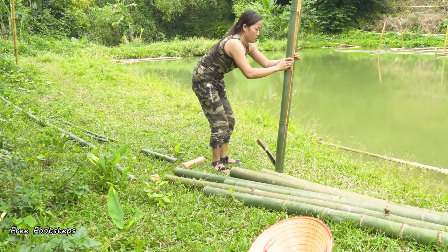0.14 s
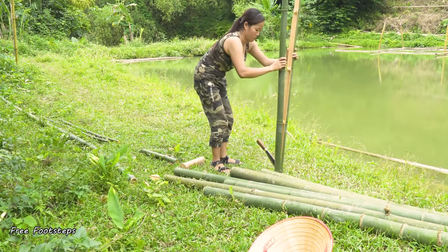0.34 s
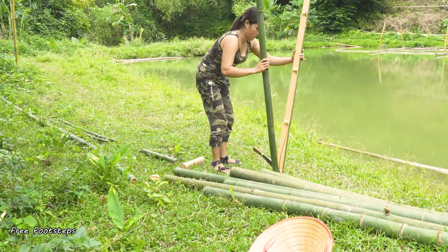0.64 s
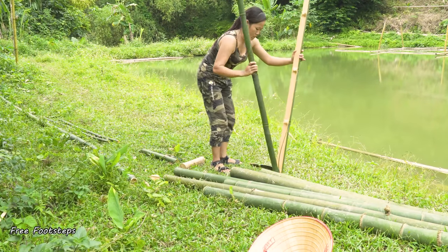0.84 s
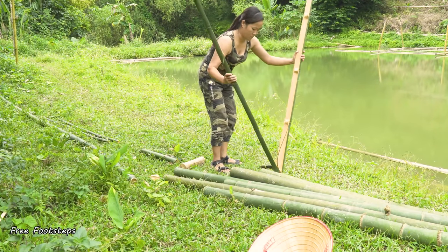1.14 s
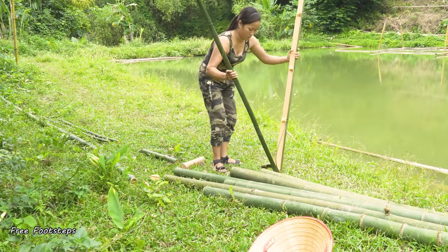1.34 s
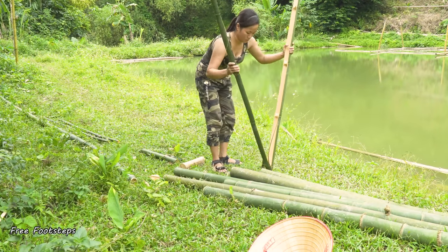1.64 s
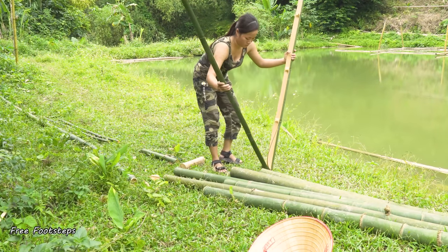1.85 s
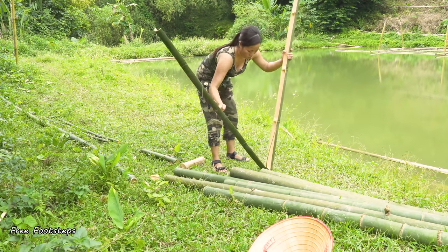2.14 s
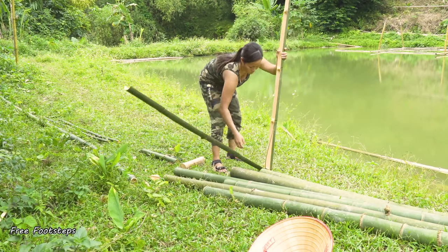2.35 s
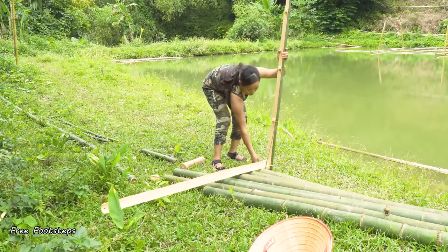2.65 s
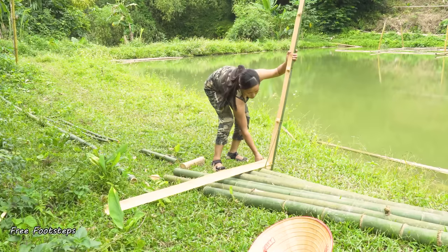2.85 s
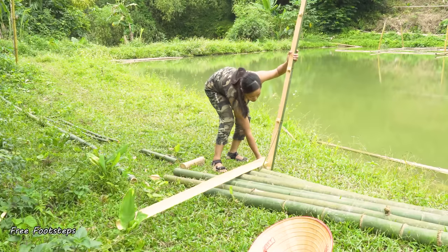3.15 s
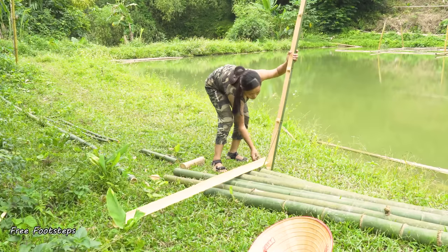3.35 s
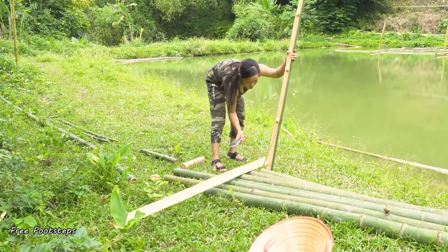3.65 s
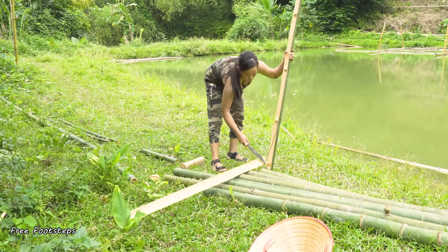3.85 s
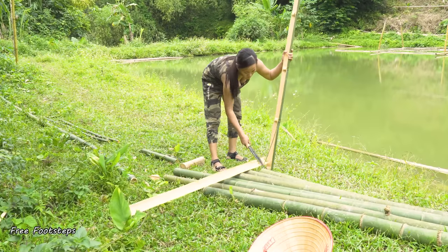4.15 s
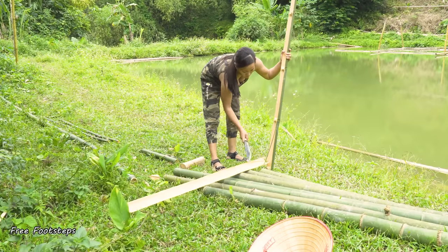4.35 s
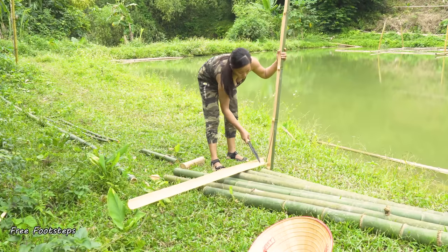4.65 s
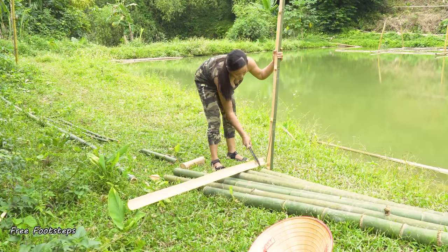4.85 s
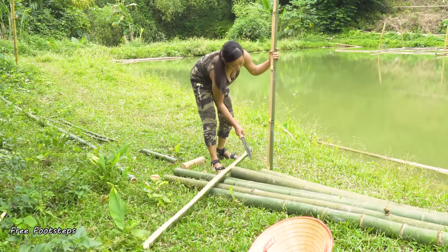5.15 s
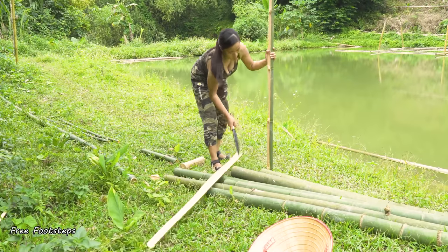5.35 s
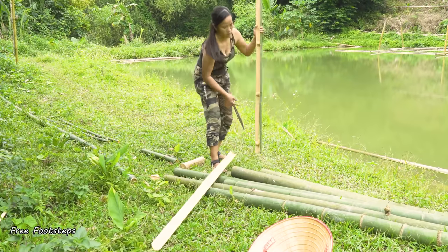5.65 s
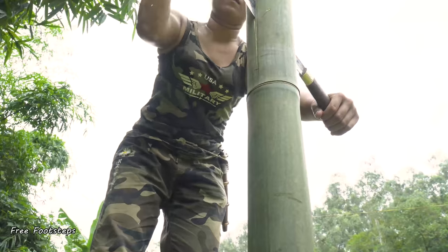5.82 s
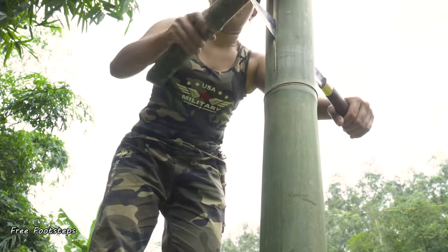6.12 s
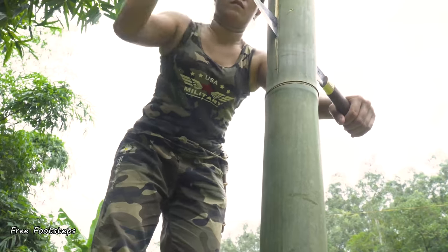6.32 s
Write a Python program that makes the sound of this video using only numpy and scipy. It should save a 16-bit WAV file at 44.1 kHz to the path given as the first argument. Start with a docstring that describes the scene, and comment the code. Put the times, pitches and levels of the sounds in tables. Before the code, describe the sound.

Open-air bamboo work with short, scattered reflections from the bank. Early snaps and gritty ripping give way to a quiet spell with light ticks, then a hollow clatter. After a pause come four hard, dry machete strokes, the first and last rebounding quickly, with a trace of thin steel ring. Knocks tumble into a bright woody clatter; one deeper hollow blow ends it, over steady low wind and high insects.

```python
"""Wind rumbles on the microphone as filtered noise and insects shrill in narrow bands of noise, all through.
Green bamboo splits on a pond bank: noise-burst cracks, grainy tearing, dull bumps, then a hand's sliding hiss.
A first half clatters onto a stack, each landing a crunch of noise with decaying sine modes.
A machete chops the second half free with a thin steel ring; it skids off in small knocks and clatters too.
Last, a club drives the blade into a standing pole close by; the bank scatters the contacts back."""
import sys
import numpy as np
from scipy import signal
from scipy.fft import rfft, irfft, next_fast_len
from scipy.io import wavfile
from scipy.ndimage import map_coordinates

SR = 44100
rng = np.random.default_rng(int(sys.argv[2]) if len(sys.argv) > 2 else 0)


def file_out(sig):
    """Save sig as 16-bit WAV at sys.argv[1]."""
    # one column per channel
    cols = np.atleast_2d(sig).T
    # limit, then scale
    lim = np.clip(cols, -1, 1)
    pcm = np.round(lim * 32767).astype(np.int16)
    wavfile.write(sys.argv[1], SR, pcm)


N = 285768  # length [samples]


def amp(db):
    """Decibels to a linear gain."""
    return 10 ** (np.asarray(db) / 20)


def unit(x):
    """The signal scaled to rms 1."""
    return x / np.sqrt(np.mean(x ** 2) + 1e-20)


def along(points, hz):
    """Read (frequency [Hz], value) points on a log frequency axis."""
    f, v = np.transpose(points)
    return np.interp(np.log(hz + 1), np.log(f + 1), v)


def curves(rows):
    """One value per sample for each column after the time."""
    s, *cols = np.transpose(rows)
    return [np.interp(np.arange(N) / SR, s, c) for c in cols]


def wobble(rate, size=N):
    """A smooth random curve, rate knots a second."""
    knots = rng.standard_normal(int(size * rate / SR) + 4)
    return map_coordinates(knots, [np.arange(size) * rate / SR])


def filtered(x, response):
    """The signal shaped by a response of frequency."""
    size = next_fast_len(len(x) + SR // 4)
    spectrum = rfft(x, size) * response(np.fft.rfftfreq(size, 1 / SR))
    return irfft(spectrum, size)[:len(x)]


def noise(colour):
    """Noise of rms 1 with the given colour."""
    return unit(filtered(rng.standard_normal(N), lambda hz: amp(along(colour, hz))))


def shrill(centre_hz, width_hz):
    """Noise of rms 1 in one resonance."""
    return unit(filtered(rng.standard_normal(N), lambda hz: 1 / (1 + ((hz - centre_hz) / width_hz) ** 2)))


def causal(gain):
    """The minimum-phase response with this gain, so nothing sounds ahead of its cause."""
    cepstrum = irfft(np.log(np.maximum(gain, 1e-6)))
    half = len(cepstrum) // 2
    cepstrum[1:half] *= 2
    cepstrum[half + 1:] = 0
    return np.exp(rfft(cepstrum))


def add(track, s, sound):
    """Mix a sound into the track at time s."""
    start = max(round(s * SR), 0)
    track[start:start + len(sound)] += sound[:len(track) - start]


# colour of the bamboo wall: (frequency [Hz], level [dB])
WALL_COLOUR = [(60, -24), (150, 4.5), (300, 16.5), (600, 14.5), (1200, 12), (2300, 11), (3500, 10),
               (5500, 10.5), (8000, 3), (11000, 2.5), (16000, -11.5)]
# reach of a heavy contact, which weights every thud setting: (frequency [Hz], share)
THUD_REACH = [(600, 0.43), (1200, 0.0037)]
# reach of a sharp contact, which weights every snap setting: (frequency [Hz], share)
SNAP_REACH = [(3200, 0.16), (6500, 0.74), (14000, 1.55)]


def contact(knock_hz, thud_db, snap_db, t60, crunch, knock_db=6, knock_octaves=0.51, size=16384):
    """A sharp push and a dying crunch of fibres, heard through the wall, which resonates at the struck spot."""
    t, hz = np.arange(size) / SR, np.fft.rfftfreq(size, 1 / SR)
    clumps = amp(2.3 * wobble(704, size=size))
    force = crunch * clumps * rng.standard_normal(size) * amp(-60 * t / max(t60, .004))
    force[0] = 1  # the push
    spot_db = knock_db * np.exp(-(np.log2((hz + 1) / knock_hz) / knock_octaves) ** 2)
    weight_db = thud_db * along(THUD_REACH, hz)
    sharpness_db = snap_db * along(SNAP_REACH, hz)
    colour = amp(along(WALL_COLOUR, hz) + spot_db + weight_db + sharpness_db)
    return 2.197 * irfft(rfft(force) * causal(colour))


def ring(modes, swell_cycles, size=16384):
    """Modes at new strengths; each takes some cycles to build up, so the deep ones bloom last."""
    t = np.arange(size) / SR
    hz, db, t60 = np.transpose(modes)[:, :, None]
    strength = amp(db + 2 * rng.standard_normal(hz.shape))
    pitch = hz * (1 + 0.0078 * rng.standard_normal(hz.shape))
    swell = 1 - np.exp(-(t * hz / swell_cycles) ** 2)
    phase = 2 * np.pi * (pitch * t + rng.random(hz.shape))
    return np.sum(strength * swell * amp(-60 * t / t60) * np.sin(phase), axis=0)


# decay of the scatter from the bank: (frequency [Hz], t60 [s])
BANK_DECAY = [(200, 0.46), (600, 0.2), (2000, 0.23), (6000, 0.47), (14000, 0.16)]
# colour of that scatter: (frequency [Hz], level [dB])
BANK_COLOUR = [(100, -5), (300, 0), (700, 6.5), (2000, -6), (5000, -12), (14000, -4)]


def outdoors(x, wet_db, rise=0.012):
    """The sound plus its scatter from the bank, which builds up (the deep part last) and dies away."""
    hz, t, grains = signal.stft(rng.standard_normal(SR // 2), SR, nperseg=256)
    build = rise * (1000 / np.clip(hz, 250, 4000))[:, None] ** 0.4
    decay = amp(-60 * t / along(BANK_DECAY, hz)[:, None])
    swell = 1 - np.exp(-(t / build) ** 3)
    tail = signal.istft(grains * decay * swell, SR, nperseg=256)[1]
    tail = filtered(tail / np.linalg.norm(tail), lambda f: amp(along(BANK_COLOUR, f)))
    wet = amp(wet_db) * signal.fftconvolve(x, tail)
    return np.pad(x, (0, len(wet) - len(x))) + wet


def bending_echo(x, echo_db=-9, travel=.019):
    """Bending waves come back from the pole's end, the slow deep ones last; travel [s] is the trip at 1 kHz."""
    def response(hz):
        khz = hz / 1000
        phase = 4 * np.pi * travel * hz / np.sqrt(khz + 1e-9)
        treble_loss = 1 / (1 + (khz / 2.1) ** 2)
        bass_loss = khz / (khz + 0.085)
        return amp(echo_db) * np.exp(-1j * phase) * treble_loss * bass_loss
    return x + filtered(x, response)


def blows(table, modes, crunch, swell_cycles, wet_db, bite_db):
    """Each blow first grazes the skin, then crunches the wall and sets the cane ringing."""
    track = np.zeros(N)
    for s, db, knock_hz, thud_db, snap_db, t60, ring_db in table:
        # a reversed contact swells up to the blow
        graze = contact(knock_hz, thud_db, snap_db, t60=0.0082, crunch=0.5)[::-1]
        add(track, s - len(graze) / SR, amp(db + bite_db) * graze)
        blow = bending_echo(contact(knock_hz, thud_db, snap_db, t60, crunch))
        add(track, s, amp(db) * outdoors(blow, wet_db))
        add(track, s, amp(db + ring_db) * ring(modes, swell_cycles))
    return track


# gusts on the microphone: (time [s], relative strength [dB])
GUSTS = [(0.0, -37), (0.18, -45.5), (0.29, -28), (0.72, -46.5), (0.81, -34), (1.14, -39.5), (1.17, -27),
         (1.77, -37.5), (1.82, -42.5), (3.03, -31), (3.08, -42.5), (3.43, -38.5), (3.55, -49), (3.83, -34),
         (4.17, -52), (4.55, -30.5), (6.39, -36.5), (6.48, -40.5)]
# colour of the deep buffeting: (frequency [Hz], level [dB])
RUMBLE_COLOUR = [(10, -6), (25, -1.5), (45, -3), (62, -10), (100, -23.5), (170, -44.5), (400, -90)]
# colour of the smaller, higher eddies: (frequency [Hz], level [dB])
EDDY_COLOUR = [(30, 8), (75, -0.5), (120, -6.5), (200, -20.5), (400, -40.5), (900, -82)]
# colour of the bank's steady hush: (frequency [Hz], level [dB])
HUSH_COLOUR = [(100, -6), (400, -7.5), (650, -9), (1300, -8.5), (3200, -13.5), (4500, -16.5), (6800, -22),
               (8500, -27), (16000, -29.5)]


def wind():
    """Gusts buffet the microphone over the hush of the bank; strong ones shed smaller, higher eddies."""
    gust_db, = curves(GUSTS)
    eddy_db = -45.0 + 1.59 * (gust_db - gust_db.mean()) + 3.3 * wobble(12)
    rumble = amp(gust_db + 5.0) * noise(RUMBLE_COLOUR)
    eddies = amp(eddy_db) * noise(EDDY_COLOUR)
    hush = amp(-55.0) * noise(HUSH_COLOUR)
    return rumble + eddies + hush


# the thin insect, which falls back once: (time [s], level [dB])
THIN_SHRILL = [(3.15, -70), (3.25, -88), (3.5, -79), (3.62, -69)]


def insects():
    """A steady broad chorus and one thin shrill that falls back once, each noise in one resonance."""
    shrill_db, = curves(THIN_SHRILL)
    chorus = amp(-62.0) * shrill(centre_hz=4940, width_hz=180)
    return chorus + amp(shrill_db) * shrill(centre_hz=7530, width_hz=77)


CRACK_KNOCK_HZ, SNAP_DB_PER_OCTAVE = 2350, 10  # thinner fibres snap sharper and higher
CRACK_THUD_DB, CRACK_CRUNCH_T60 = -23, 0.05  # crunch [s] at a snap of 0 dB
CRACK_HALVING_DB = 24  # the snap that halves a crack's length
# fibres giving way along the split: (time [s], relative level [dB], snap [dB])
FIBRE_CRACKS = [(0.506, -29.5, 2.5), (0.5827, -19, 11.5), (.5871, -10, -7), (.628, -5, -2), (.6545, -31, 9),
                (0.6974, -15.5, -7.5), (.7526, -29, 5.5), (0.7828, -28.5, -10), (1.4464, -30.5, -5),
                (2.0219, -31, 14), (2.0695, -33, 8), (2.2222, -41.5, 13.5), (2.2606, -39.5, 6),
                (2.4321, -37, 11.5), (2.7365, -36.5, 7), (6.0692, -24, -1)]
# modes of the wall beside the running split: (frequency [Hz], level [dB], t60 [s])
SPLIT_MODES = [(1137, 6, 0.046), (1395, 5, 0.056), (2397, 8.5, 0.047)]


def cracks():
    """Single fibres snap with a short contact and set the wall beside the split ringing."""
    track = np.zeros(N)
    for s, db, snap_db in FIBRE_CRACKS:
        knock_hz = CRACK_KNOCK_HZ * 2 ** (snap_db / SNAP_DB_PER_OCTAVE)
        t60 = CRACK_CRUNCH_T60 * 2 ** (-snap_db / CRACK_HALVING_DB)
        crack = contact(knock_hz, CRACK_THUD_DB, snap_db, t60, crunch=0.17)
        crack += amp(-13.0) * ring(SPLIT_MODES, swell_cycles=1)
        add(track, s, amp(db - 3.5) * outdoors(crack, wet_db=-6.5))
    return track


RUB_ATTACK_S, RUB_SAG_DB_PER_S, RUB_RELEASE_T60 = 0.027, 13.5, 0.24  # release [s]; the attack ends at the start
# fibres tearing and grass rubbing along the pole, one row a movement:
# (start time [s], length [s], level [dB])
RUB_MOVES = [(0.601, 0.16, -38), (0.86, .3, -55), (1.82, 0.44, -53), (2.504, 0.24, -46.5),
             (3.12, 0.067, -57), (5.0, 0.25, -49), (5.25, 0.092, -40.5), (5.64, 0.034, -52)]


def rubbing(t):
    """Strength of the rubbing: each movement takes hold quickly, eases off as it goes on, then dies away."""
    strength = np.zeros(N)
    for start, length, db in RUB_MOVES:
        attack = np.clip(1 + (t - start) / RUB_ATTACK_S, 0, 1)
        sag_db = RUB_SAG_DB_PER_S * np.clip(t - start, 0, length)
        release_db = 60 * np.maximum(t - start - length, 0) / RUB_RELEASE_T60
        strength += attack * amp(db - sag_db - release_db)
    return strength


# colour of the small fibres: (frequency [Hz], level [dB])
FIBRE_COLOUR = [(100, -51), (300, -4.5), (1300, -2.5), (4200, -2), (7000, -7.5), (12000, -12), (16000, -17)]


def tearing():
    """A crackle of small fibres: random snaps, about 450 a second, each a brief burst of noise."""
    snaps = (rng.random(N) < 450 / SR) * rng.exponential(size=N)
    bursts = signal.lfilter([1], [1, -np.exp(-1 / (.0015 * SR))], snaps)  # 1.5 ms decay
    grit = (unit(bursts) + .3) * rng.standard_normal(N)
    crackle = unit(filtered(grit, lambda hz: causal(amp(along(FIBRE_COLOUR, hz)))))
    return rubbing(np.arange(N) / SR) * crackle


# a pole's butt bumping as it is shifted: (time [s], relative level [dB])
BUTT_BUMPS = [(0.8761, -30.5), (0.9169, -30), (1.05, -36), (1.797, -23), (2.9826, -36.5), (6.224, -36.5)]


def bumping():
    """A shifted pole meets its footing with a dull, heavy knock."""
    track = np.zeros(N)
    for s, db in BUTT_BUMPS:
        bump = contact(knock_hz=1340, thud_db=-2.5, snap_db=-12.5, t60=0.082, crunch=0.16)
        bump += amp(-13) * ring(SPLIT_MODES, swell_cycles=1)
        add(track, s, amp(db - 4.0) * outdoors(bump, wet_db=-6.5))
    return track


# the hand sliding down the pole: (time [s], level [dB])
HAND_SLIDE = [(2.15, -87), (2.28, -57.5), (2.45, -51), (2.65, -82)]


def sliding():
    """Skin rubbing along the pole hisses as noise in one broad resonance."""
    slide_db, = curves(HAND_SLIDE)
    return amp(slide_db) * shrill(centre_hz=3680, width_hz=700)


FALL_SNAP_DB, FALL_CRUNCH_T60 = -13.5, 0.043  # cane on cane is a blunt contact; crunch [s]
# split halves landing on the stack:
# (time [s], relative level [dB], knock [Hz], thud [dB], ring [dB])
LANDINGS = [(2.5572, -12.5, 660, 1, -10.5), (2.5664, -6, 706, -17.5, -20), (2.596, -15, 3300, -26, -20),
            (2.6427, -21, 2700, -32, -19), (2.7909, -19.5, 3200, -8, -5), (5.127, -24, 450, 4, -11),
            (5.161, -26, 1990, -5, -13), (5.2845, 2, 1970, -19, -15.5), (5.2948, -2, 1530, -13, -17),
            (5.416, -2.5, 1650, -38, -25), (5.428, -6, 1370, -14, -14.5), (5.466, -5.5, 2330, -11, -18),
            (5.492, -23.5, 683, -4, -6), (5.596, -29, 2590, -10, -16)]
# modes of the half that drops first: (frequency [Hz], level [dB], t60 [s])
FIRST_HALF_MODES = [(249, -13, 0.3), (405, -5, 0.1), (479.5, 5.5, 0.12), (626, 9, 0.029),
                    (757, -0.5, 0.064), (862, -0.5, 0.079), (1178, -10, 0.089), (1760, -3, 0.14),
                    (2510, -5.5, 0.11), (3350, 0.5, 0.072)]
# modes of the half that is chopped free: (frequency [Hz], level [dB], t60 [s])
SECOND_HALF_MODES = [(258.5, -12.5, 0.44), (414.2, -2.5, 0.24), (482, -6, 0.19), (621, -6, .15),
                     (687, -6.5, 0.17), (1360, 9, 0.048), (1610, -4, 0.11), (1900, -6, 0.067)]


def falls():
    """Each half clatters with its own modes; the second is loose only once the chopping has begun."""
    landings = [(s, db, knock_hz, thud_db, FALL_SNAP_DB, FALL_CRUNCH_T60, ring_db)
                for s, db, knock_hz, thud_db, ring_db in LANDINGS]
    first = [row for row in landings if row[0] < BLADE_CHOPS[0][0]]
    second = landings[len(first):]
    return (blows(first, FIRST_HALF_MODES, crunch=0.14, swell_cycles=6.2, wet_db=-5, bite_db=-20)
            + blows(second, SECOND_HALF_MODES, crunch=0.11, swell_cycles=10.4, wet_db=-4.5, bite_db=-31))


def blade(pitch_hz=12420, size=16384):
    """The steel's thin, unsteady ring, soon damped by the cane that grips it."""
    t = np.arange(size) / SR
    t60 = .2
    return amp(-60 * t / t60) * np.sin(2 * np.pi * pitch_hz * t + wobble(346, size=size))


BUNCH_S = .1  # longest gap between contacts in a bunch
STROKE_SNAP_DB, REBOUND_SNAP_DB = -11.5, -18.5  # sharpness of a bunch's first contact and of the rest
CHOP_KNOCK_HZ, CHOP_RING_DB = 2320, -15  # every chop lands on the same spot
REBOUND_DAMPING_DB = 6  # with the blade lodged in it, the cane rings less
# the blade meeting the cane, in bunches of a stroke and its rebounds:
# (time [s], relative level [dB], thud [dB], crunch t60 [s])
BLADE_CHOPS = [(3.907, -1.5, -28, 0.049), (3.914, -2.5, -17, 0.052), (3.927, -7.5, -13, 0.04),
               (3.939, -6.5, -5.5, 0.062), (3.9556, -3.5, -23, 0.052), (3.9965, -12.5, -28, 0.042),
               (4.2725, 4, -17.5, 0.016), (4.3483, -3.5, -38, 0.02), (4.6182, -2.5, -26, 0.054),
               (4.979, 4.5, -15, 0.021), (5.022, -3.5, -11, 0.046), (5.055, -22, -10, .029)]
# modes of the chopped cane with the blade in it: (frequency [Hz], level [dB], t60 [s])
CANE_MODES = [(283, -11, 0.21), (475, -11, 0.17), (695.6, -9, 0.13), (866, -10, .12), (1308, -6.5, 0.085),
              (1920, 0, 0.06), (2254, -4, 0.081), (2420, 8, 0.031), (2670, -11.5, 0.041)]


def chopping():
    """The machete bites sharply, then rebounds more bluntly; the sharper the bite, the more the steel rings."""
    bites, steel, last_s = [], np.zeros(N), 0
    for s, db, thud_db, t60 in BLADE_CHOPS:
        rebound = s - last_s < BUNCH_S
        snap_db = REBOUND_SNAP_DB if rebound else STROKE_SNAP_DB
        ring_db = CHOP_RING_DB - rebound * REBOUND_DAMPING_DB
        bites.append((s, db, CHOP_KNOCK_HZ, thud_db, snap_db, t60, ring_db))
        add(steel, s, amp(db + snap_db - 33) * blade())
        last_s = s
    return blows(bites, CANE_MODES, crunch=.12, swell_cycles=8.8, wet_db=-9, bite_db=-28.0) + steel


def skitter(start=5.004, length=0.082, level_db=-15, fall_db=12, count=16):
    """The freed half skids off the blade in a run of small knocks, each at another spot, slower and weaker."""
    track = np.zeros(N)
    for k, (lag, size, spot) in enumerate(rng.standard_normal((count, 3))):
        progress = ((k + .5) / count) ** 1.4  # the gaps widen
        knock = contact(1400 * np.exp(.5 * spot), thud_db=-3, snap_db=-12.5, t60=0.026, crunch=0.16)
        s = start + length * progress + 0.0011 * lag
        add(track, s, amp(level_db - fall_db * progress + 2 * size) * knock)
    return outdoors(track, wet_db=-2.5)[:N]


# the club on the back of the blade:
# (time [s], relative level [dB], knock [Hz], thud [dB], snap [dB], crunch t60 [s], ring [dB])
CLUB_BLOWS = [(6.0437, -7, 1190, 2.5, -10.5, 0.039, -12)]
# modes of the standing pole: (frequency [Hz], level [dB], t60 [s])
POLE_MODES = [(193, -4.5, 0.32), (299, -15, .2), (482, 0.5, 0.28), (568, -9.5, 0.34), (892, -10, 0.24),
              (1110, 20.5, 0.037), (1457, 2.5, 0.054)]


def clubbing():
    """The club drives the blade into the standing pole, whose modes swell up slowly after the crunch."""
    return blows(CLUB_BLOWS, POLE_MODES, crunch=0.052, swell_cycles=13, wet_db=-5.5, bite_db=-19.0)


def scene():
    """All the work on the bamboo, with the wind and the insects."""
    small_sounds = cracks() + tearing() + bumping() + sliding() + skitter()
    heavy_blows = amp(-1) * (falls() + chopping() + clubbing())
    return wind() + insects() + small_sounds + heavy_blows


TOP_HZ = 16100  # band limit


def record(dry):
    """The recorder flattens the loudest peaks and keeps next to nothing above its band limit."""
    top = .7  # ceiling of the peaks, as a share of full scale
    clipped = dry / (1 + np.abs(dry / top) ** 6) ** (1 / 6)
    return filtered(clipped, lambda hz: 1 / np.sqrt(1 + (hz / TOP_HZ) ** 120))


dry = scene()
out = record(dry)
file_out(out)
```